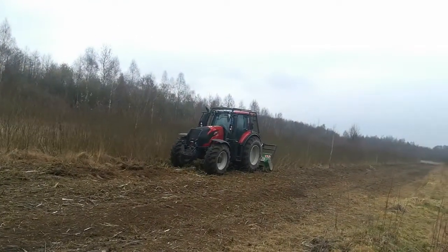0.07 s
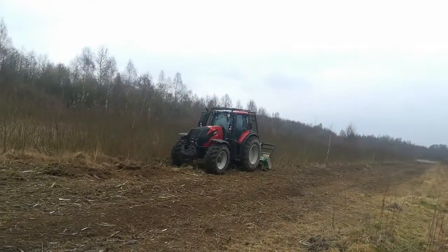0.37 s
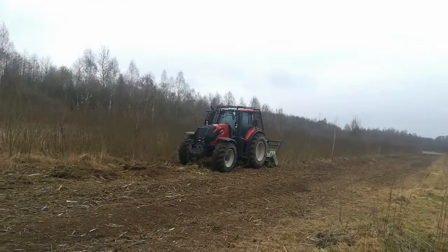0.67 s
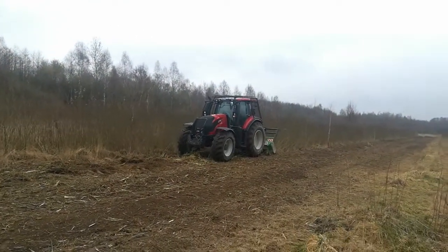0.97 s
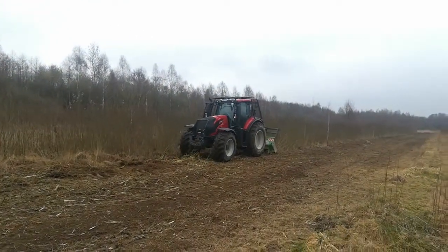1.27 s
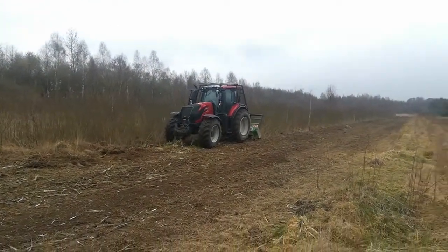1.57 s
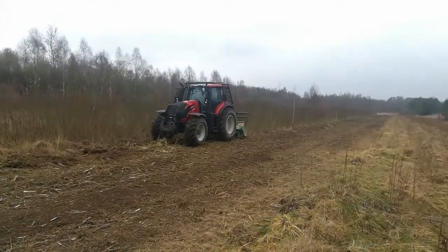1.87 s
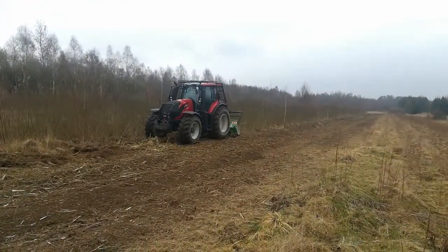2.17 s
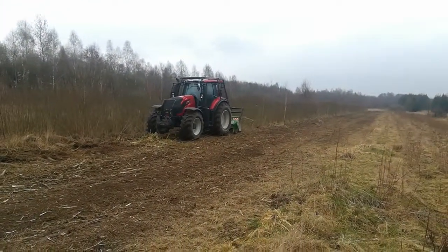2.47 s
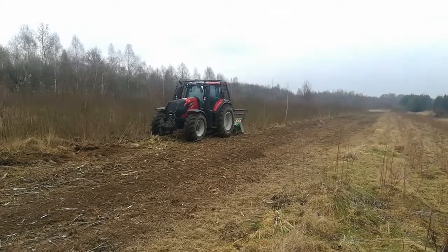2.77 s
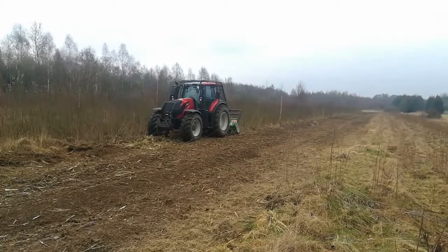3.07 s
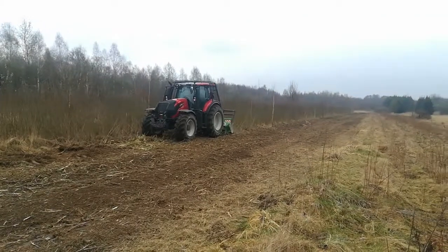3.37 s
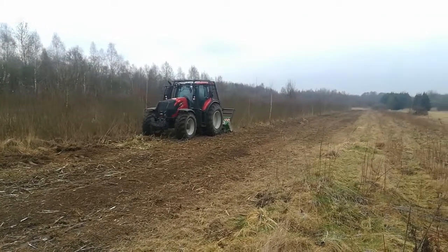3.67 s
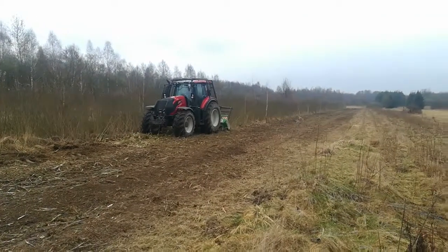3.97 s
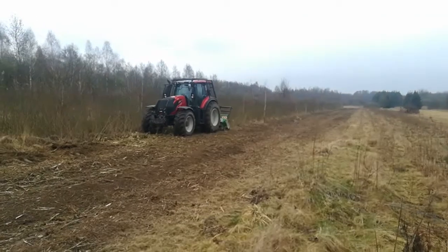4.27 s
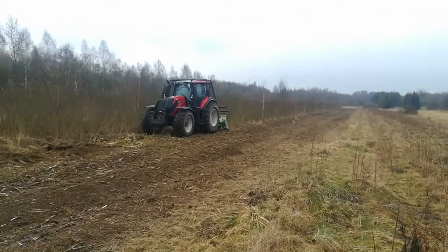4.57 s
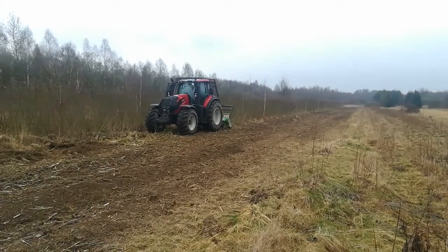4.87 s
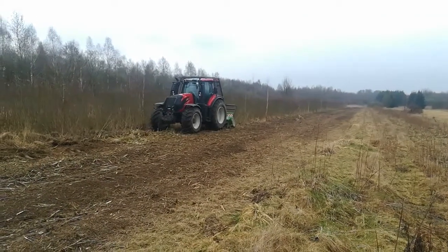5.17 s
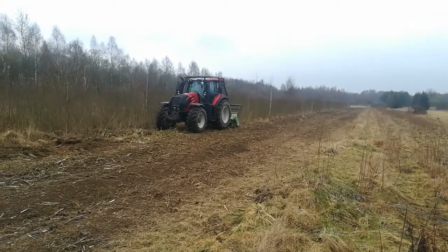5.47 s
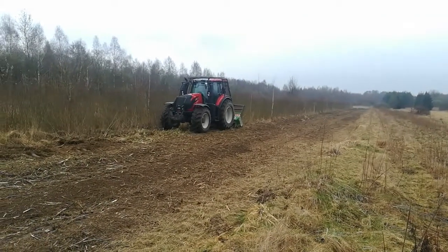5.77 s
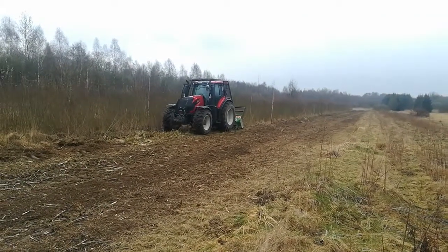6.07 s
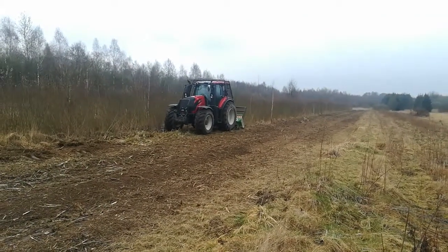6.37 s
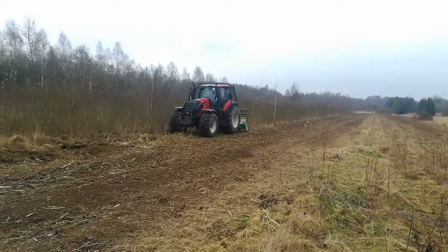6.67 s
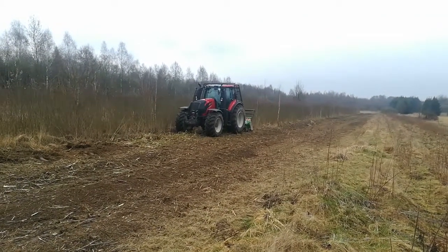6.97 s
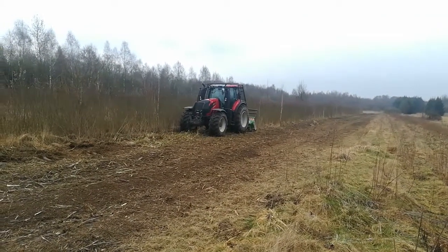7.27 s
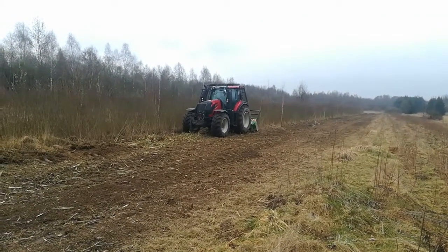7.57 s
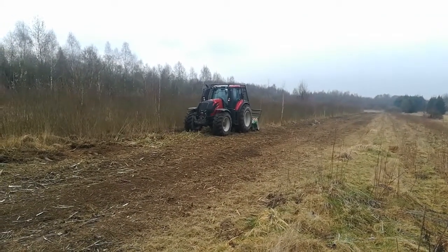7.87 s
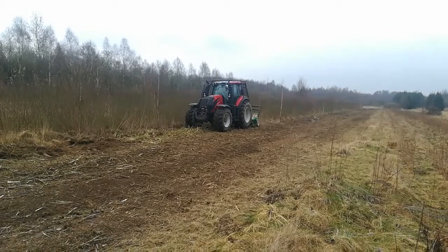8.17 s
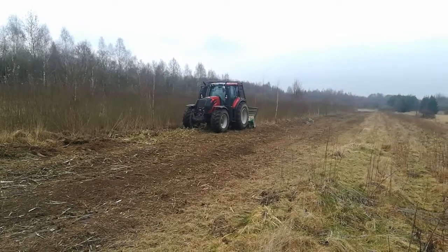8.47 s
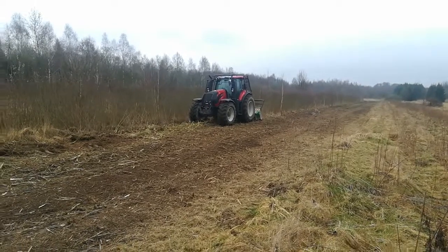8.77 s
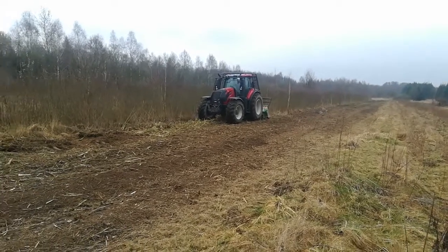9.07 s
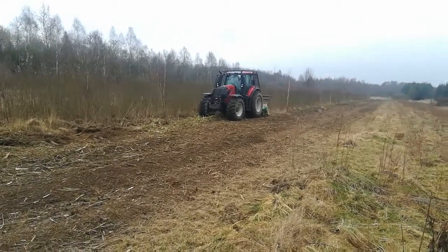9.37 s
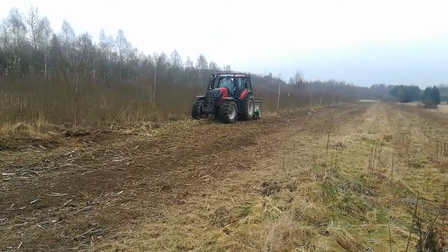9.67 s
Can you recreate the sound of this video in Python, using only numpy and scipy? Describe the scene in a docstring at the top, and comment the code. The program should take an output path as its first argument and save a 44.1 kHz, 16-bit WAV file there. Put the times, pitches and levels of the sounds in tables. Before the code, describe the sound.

A diesel tractor drones throughout, heard from some distance in an open field. Its low exhaust throb blends with engine clatter, the hum of a mulcher rotor and a faint gear whine. Over it runs a constant crackling hiss of twigs and stems being shredded. The first two seconds are the busiest, with surges of crunching, sharp branch snaps and short clangs of wood hitting metal, clustered around 0.3, 0.9, 1.3 and 1.8 seconds. Further snaps come at about 3.2, 3.9, 5.2 and 5.8 to 6.1 seconds, with lighter clangs near 3.2, 5 and 5.7 seconds. A thin whine swells around 2 seconds and again from 4.5 to 6. The engine sags slightly under load and recovers. A few softer snaps fall between 7.4 and 9 seconds, with one last clang, and the machine carries on, slightly quieter, until nearly 10 seconds.

```python
"""Tractor mulching brush.

A six-cylinder diesel creeps away across an open field, driving a flail mulcher at governed speed.
Unequal cylinders make the exhaust throb, firings rattle the block, gears whine and the rotor hums.
The flails shred twigs and stems in a constant crackle; thicker branches snap, and thrown wood
clangs on the steel hood. Heard through two microphone ports."""
import sys
import numpy as np
from scipy import signal
from scipy.fft import rfft, irfft, next_fast_len
from scipy.io import wavfile
from scipy.ndimage import map_coordinates

SR = 44100
rng = np.random.default_rng(int(sys.argv[2]) if len(sys.argv) > 2 else 0)


def dump_mix(stems):
    """Bounce the given channels to the path in sys.argv[1] as a 16-bit WAV at rate SR."""
    frames = np.atleast_2d(stems).T  # one column per channel
    limited = np.clip(frames, -1, 1)  # hard clip at full scale
    pcm = np.round(limited * 32767).astype(np.int16)
    wavfile.write(sys.argv[1], SR, pcm)


N = 428652


def amp(db):
    """Decibels to gain."""
    return 10 ** (np.asarray(db) / 20)


def unit(x):
    """Scale to rms 1."""
    return x / np.sqrt(np.mean(x ** 2) + 1e-20)


def along(points, hz):
    """Interpolate (f/Hz, value) points on a log axis."""
    f, v = np.transpose(points)
    return np.interp(np.log(hz + 1), np.log(f + 1), v)


def curves(rows):
    """One value per sample for each column after t/s."""
    times_s, *columns = np.transpose(rows)
    return [np.interp(np.arange(N) / SR, times_s, column) for column in columns]


def wobble(rate_hz):
    """Smooth random curve with knots at rate_hz."""
    knots = rng.standard_normal(int(N * rate_hz / SR) + 4)
    return map_coordinates(knots, [np.arange(N) * rate_hz / SR])


def filtered(x, response):
    """Apply a complex frequency response."""
    size = next_fast_len(N + SR // 4)
    return irfft(rfft(x, size) * response(np.fft.rfftfreq(size, 1 / SR)), size)[..., :N]


def add(track, start_s, sound):
    """Mix in a short sound."""
    part = track[..., max(round(start_s * SR), 0):][..., :sound.shape[-1]]
    part += sound[..., :part.shape[-1]]


# Likeness of the two ports: f/Hz, coherence
PORT_COHERENCE = [(110, 1), (160, .998), (300, 1), (600, 0.69), (1200, 1), (2000, 0.81), (4000, 0.48),
                  (8000, 0.41), (14000, 0.17)]


def spread(pair, spectrum):
    """Colour two unrelated signals and blend them to stereo at rms 1; the treble is least alike."""
    def response(hz):
        angle = np.arccos(np.clip(along(PORT_COHERENCE, hz), 0, 1)) / 2
        return amp(along(spectrum, hz)) * [np.cos(angle), np.sin(angle)]
    mid, side = filtered(pair, response)
    return unit(np.array([mid + side, mid - side]))


def hum(turns, lines, waver_db, drift_rad, smear=.23):
    """Lines locked to a shaft. Ducts smear each turn's pulse; the air makes level and phase waver."""
    out = np.zeros(N)
    for order, db in lines:
        phase = 2 * np.pi * (order * turns - smear * order ** 2) + drift_rad * wobble(5)
        out += np.sqrt(2) * amp(db + waver_db * wobble(4)) * np.sin(phase)
    return out


# Flail rotor and belt drive lines: shaft order, level/dB
ROTOR_LINES = [(1, -52), (2, -59), (3, -54.5), (4, -49), (5, -57.5), (6, -68)]
BELT_LINES = [(1, -68), (2, -51), (3, -53), (4, -51.5)]


def shaft_hum(cycles):
    """Rotor, belt drive and cooling fan turn at fixed ratios to the engine."""
    rotor = hum(2.864 * cycles, ROTOR_LINES, waver_db=2.5, drift_rad=.16)
    belt = hum(1.704 * cycles, BELT_LINES, waver_db=0, drift_rad=.15)
    fan = hum(10.92 * cycles, [(.99, -42)], waver_db=-.5, drift_rad=.12)
    return rotor + belt + fan


# Gear and block whine, plus a faint steady tone at the hood's ringing pitch, near 1010 Hz:
# engine-cycle order, level/dB
WHINE_LINES = [(31, -66), (34, -63), (36, -55), (38, -61), (43, -54), (47, -54), (49, -53), (51, -53),
               (54.8, -56), (58, -56), (60, -49), (63, -56), (72, -53), (78, -53), (90, -50), (107, -54)]
# One gear mesh singing out under load: t/s, level/dB
MESH_LEVEL = [(0, -67), (2.2, -47), (3.3, -52), (4.2, -56), (4.7, -42), (5.3, -47), (5.9, -45), (6.5, -51),
              (9.72, -50)]


def whine(cycles, path_db):
    """Gear whine and a faint tone at the hood's pitch fade with distance; one mesh swells under load."""
    mesh_db, = curves(MESH_LEVEL)
    mesh = hum(cycles, [(120, 0)], waver_db=1.5, drift_rad=.3)
    tones = hum(cycles, WHINE_LINES, waver_db=2, drift_rad=.25)
    return amp(1.55 * (path_db - path_db.mean())) * tones + amp(mesh_db) * mesh


# Block noise spectrum: f/Hz, relative density/dB
BLOCK_SPECTRUM = [(200, -33), (430, -27), (490, -15), (560, -10.5), (780, -5), (950, -6), (1130, -6.5),
                  (1430, 1.5), (1720, -1.5), (1860, -7.5), (2150, -4), (2550, -15), (3000, -16.5),
                  (9000, -49.5)]
# Bright engine band, sinking in pitch as the tractor draws off: t/s, f/Hz, level/dB
SHEEN_BAND = [(0, 1870, -37.5), (.6, 1807, -34), (1.3, 1655, -44), (2, 1503, -52), (3.5, 1443, -48.5),
              (9.7, 1450, -39)]


def clatter(cycles, path_db, block_db=-30.96, cylinders=6):
    """Every firing rattles the block; each cylinder has its own strength and repeating rattle."""
    firings = cylinders * cycles
    strength = 1 + .07 * np.cos(2 * np.pi * np.floor(firings) / cylinders)
    knock = unit(strength * (1 + .28 * np.exp(-(firings % 1) / .35)))
    one_cycle = rng.standard_normal(round(N / cycles[-1]))
    repeating = map_coordinates(one_cycle, [cycles % 1 * len(one_cycle)], mode="grid-wrap")
    repeating_lows = filtered(repeating, lambda hz: 1 / (1 + (hz / 900) ** 2))
    rattle = rng.standard_normal((2, N)) + np.outer([1, 0], .5 * repeating_lows)
    block = amp(block_db + path_db) * spread(rattle * knock, BLOCK_SPECTRUM)
    sheen_hz, sheen_db = curves(SHEEN_BAND)
    phase = 2 * np.pi * np.cumsum(sheen_hz) / SR
    narrow_noise = sum(wobble(210) * wave(phase) for wave in (np.cos, np.sin))
    return block + amp(sheen_db) * unit(narrow_noise) * knock


# Exhaust lines: engine-cycle order, relative level/dB
EXHAUST_LINES = [(3, -53), (5, -57), (6, -37.5), (7, -47), (9, -49), (10, -39), (11, -42), (12, -39.5),
                 (13, -59), (14, -57), (16, -63), (18, -68), (20, -67), (21, -71)]
# Gas flow spectrum: f/Hz, relative density/dB
ROAR_SPECTRUM = [(15, -30), (28, -3), (45, -13.5), (90, 4), (130, 1.5), (185, -1), (225, -4), (280, -12.5),
                 (420, -18.5), (700, -50), (2000, -90)]


def exhaust(cycles, gain_db, throb_db=-32, roar_db=-38.9):
    """Unequal cylinders put strong lines between the firing orders; the gas flow roars beneath."""
    throb = unit(hum(cycles, EXHAUST_LINES, waver_db=1, drift_rad=.056))
    roar = spread(rng.standard_normal((2, N)), ROAR_SPECTRUM)
    return amp(gain_db) * (amp(throb_db) * throb + amp(roar_db) * roar)


def splinters(count=16000):
    """Dense tiny ticks in clumps, each with its own pitch, decay, size and side."""
    start, pitch, life, phase, size, side = rng.random((6, count, 1))
    t = np.arange(SR // 400) / SR
    hz = 2000 * 7 ** pitch
    t60_s = .001 + .002 * life
    ticks = amp(12 * size ** 3) * np.sin(2 * np.pi * (hz * t + phase)) * amp(-60 * t / t60_s)
    samples = ((start * N).astype(int) + np.arange(len(t))).ravel()
    pans = np.cos(2 * np.pi * side), np.sin(2 * np.pi * side)
    pair = [np.bincount(samples, (ticks * pan).ravel(), N)[:N] for pan in pans]
    return unit(np.array(pair) * amp(1.5 * wobble(30)))


# Whole bushes dragged into the rotor: t/s, decay/s, extra hiss/dB, extra crunch/dB
BUSH_BITES = [(.19, .2, 4.5, 5), (.27, 0.1, 0.5, 2), (.89, 0.11, 6.5, 8), (1.06, 0.044, 3, 4),
              (1.55, .06, 4, 0), (1.79, .1, 4.5, 3), (1.905, 0.041, 8.5, -2), (3.19, .09, 4, 0),
              (4.19, 0.11, 3, 2), (5.18, .06, 1, 3), (5.775, .05, 3, 4), (5.86, .07, 3, -4),
              (6.125, .07, 1.5, 5), (6.73, 0.083, 1, 7.5), (7.4, .06, 2.5, 3), (7.69, .08, 4.5, 0),
              (8.29, 0.078, 4, 3), (8.41, .07, 2.5, 8), (8.94, .06, 0, 8)]


def bites_db(attack_s=.012):
    """Extra hiss and crunch: each bush loads the flails quickly, then is used up steadily."""
    t = np.arange(N) / SR
    extra_db = np.zeros((2, N))
    for start_s, decay_s, twigs_db, stems_db in BUSH_BITES:
        load = np.interp(t - start_s, [0, attack_s, attack_s + decay_s], [0, 1, 0])
        extra_db += np.outer([twigs_db, stems_db], load)
    return extra_db


# Intake of twigs and of thick stems between bushes: t/s, relative level/dB
TWIG_FEED = [(0, -40.5), (.12, -45), (.5, -40), (.7, -42.5), (1.1, -41), (1.6, -46), (1.85, -43.5),
             (2.2, -45.5), (2.5, -43.5), (3.1, -44.5), (4.1, -47.5), (4.7, -47.5), (5.1, -44.5),
             (5.6, -47.5), (6.7, -47.5), (7.25, -45.5), (8.05, -49.5), (8.5, -47), (9.72, -47.5)]
STEM_FEED = [(0, -40.5), (.55, -39.5), (.75, -43.5), (2, -43), (5.7, -42.5), (6.4, -44.5), (8.1, -48),
             (8.4, -46.5), (9.72, -48)]
# Spectra of shredded twigs and splitting stems: f/Hz, relative density/dB
TWIG_SPECTRUM = [(600, -38), (1800, -11), (2900, -3.5), (3600, -6), (4050, -2), (4400, -1), (4900, 1.5),
                 (5500, -1), (6400, -6.5), (8000, -6.5), (9600, -6.5), (11000, -14.5), (13500, -19.5),
                 (16000, -24)]
STEM_SPECTRUM = [(800, -36), (2000, -6), (2550, -0.5), (2950, 1.5), (3350, -3.5), (3750, -2), (4050, -23),
                 (4700, -13), (7000, -21), (16000, -35)]


def shredding():
    """Stems crunch and twigs hiss under the flails; the more goes in, the brighter the hiss."""
    twigs_db, stems_db = np.array(curves(TWIG_FEED) + curves(STEM_FEED)) + bites_db()
    clumps = wobble(22)
    crunch = spread(rng.standard_normal((2, N)) + .5 * splinters(), STEM_SPECTRUM)
    hiss = spread(rng.standard_normal((2, N)) + .49 * splinters(), TWIG_SPECTRUM)
    treble = filtered(hiss, lambda hz: 1 / (1 + (7000 / (hz + 1)) ** 6))
    treble_gain = amp(.11 * (twigs_db - twigs_db.mean()))
    hiss += (treble_gain - 1) * treble
    return amp(stems_db + .49 * clumps) * crunch + amp(twigs_db + 3 + .52 * clumps) * hiss


# Breaking branches: t/s, relative level/dB, f/Hz
BRANCH_SNAPS = [(.175, -24.5, 4700), (0.283, -24, 5500), (.710, -27, 4600), (.839, -24, 3200),
                (.890, -24, 7000), (.899, -24, 6500), (0.906, -21, 5000), (1.829, -24, 3000),
                (1.871, -23, 2600), (2.005, -28, 3500), (2.038, -24, 2000), (3.214, -23, 2100),
                (3.912, -23, 2200), (5.196, -23.5, 3300), (5.787, -29, 3500), (5.880, -25.5, 2400),
                (6.117, -25, 2500), (6.135, -31, 3000), (7.422, -33, 2620), (8.296, -29, 2580),
                (8.612, -26.5, 4190), (8.793, -29, 2800), (8.955, -28, 3800)]


def snaps(t60_s=.059, trim_db=-7.5):
    """Each branch breaks with a short noise burst around its own pitch."""
    out, t = np.zeros((2, N)), np.arange(SR // 10) / SR
    hz = np.fft.rfftfreq(len(t), 1 / SR)
    for start_s, db, pitch_hz in BRANCH_SNAPS:
        peak = 1 / (1 + (np.log((hz + 1) / pitch_hz) / .6) ** 2)
        colour = peak / (1 + (hz / 10000) ** 4)
        noise = unit(irfft(rfft(rng.standard_normal((3, len(t)))) * colour, len(t)))
        burst = noise[0] + .83 * noise[1:]  # common part plus one per side
        add(out, start_s, amp(db + trim_db) * amp(-60 * t / t60_s) * burst)
    return out


# Steel hood modes: f/Hz, relative level/dB, t60/s
HOOD_MODES = [(776, -0.5, 0.17), (1006.4, -4, 0.19), (1360, -3, 0.035), (1420, -2, .025), (1704, 3, 0.071),
              (1850, 0, .035), (2440, -4.5, 0.06), (3260, -2.5, 0.039), (4090, -0.5, 0.059),
              (4940, -3, 0.032)]
# Wood thrown against the hood: t/s, relative level/dB, centre f/Hz
HOOD_HITS = [(.177, -14, 2830), (.185, -28, 1010), (0.213, -18.5, 3300), (.237, -24, 3300),
             (.297, -12.5, 1600), (.300, -21, 780), (.318, -22, 780), (.330, -25, 1010),
             (.342, -10.5, 3630), (.344, -13.5, 1580), (.547, -18, 1800), (.914, -20.5, 1010),
             (.936, -24, 1010), (.962, -29, 1010), (1.276, -16.5, 2000), (1.280, -13, 1440),
             (1.829, -21, 2300), (1.837, -16.5, 1400), (3.204, -17, 1500), (5.007, -22, 1700),
             (5.740, -23, 3250), (8.955, -21, 2180)]


def clangs(attack_s=.00025, crack_t60_s=.02, trim_db=-3):
    """Chunks crack against the hood; where they land picks the modes, and clinging soil roughens them."""
    out, t = np.zeros((2, N)), np.arange(SR // 4) / SR
    mode_hz, mode_db, t60_s = np.transpose(HOOD_MODES)[..., None]
    for start_s, db, centre_hz in HOOD_HITS:
        octaves_off = np.abs(np.log2(mode_hz / centre_hz))
        strength = amp(mode_db + rng.normal(0, 1, mode_hz.shape) - 22 * octaves_off ** .6)
        wander_rad = mode_hz / 70000 * np.cumsum(rng.standard_normal((len(mode_hz), len(t))), axis=1)
        phase = 2 * np.pi * (mode_hz * t + rng.random(mode_hz.shape)) + wander_rad
        modes = strength * amp(-60 * t / t60_s) * np.sin(phase)
        ring = modes.sum(axis=0) / np.linalg.norm(strength)
        band = signal.butter(1, [centre_hz / 2, centre_hz * 1.5], "bandpass", fs=SR, output="sos")
        noise = signal.sosfilt(np.tile(band, (2, 1)), rng.standard_normal((2, len(t))))
        crack = unit(noise) * amp(-60 * t / crack_t60_s)
        onset = 1 - np.exp(-t / attack_s)
        add(out, start_s, amp(db + trim_db) * (ring + .33 * crack) * onset)
    return out


# Engine speed, sagging under load and recovering: t/s, four-stroke cycle rate/Hz
ENGINE_SPEED = [(0, 16.09), (.8, 16.055), (1.8, 16.085), (2.5, 16.035), (2.95, 15.9), (4, 15.865),
                (4.75, 16.12), (5.5, 16.07), (6.12, 16.08), (6.55, 15.94), (7.56, 15.88), (7.92, 15.96),
                (8.28, 16.135), (8.64, 16.115), (9.05, 15.865), (9.72, 15.77)]
START_M, CREEP_M_PER_S = 14.3, .67
EXHAUST_DB_PER_HZ, AIR_SWELL_DB = 3, .5


def scene():
    """All shafts follow the engine, which fades with distance and throbs less when dragged down."""
    cycle_hz, = curves(ENGINE_SPEED)
    cycles = np.cumsum(cycle_hz) / SR
    distance_m = START_M + CREEP_M_PER_S * np.arange(N) / SR
    spreading_db = 20 * np.log10(START_M / distance_m)
    exhaust_gain_db = spreading_db + EXHAUST_DB_PER_HZ * (cycle_hz - cycle_hz.mean())
    path_db = spreading_db + AIR_SWELL_DB * wobble(7)
    tractor = exhaust(cycles, exhaust_gain_db) + clatter(cycles, path_db) + whine(cycles, path_db)
    return tractor + shaft_hum(cycles) + shredding() + snaps() + clangs()


# Port balance: f/Hz, left minus right/dB
PORT_BALANCE = [(200, -0.5), (380, 0.5), (550, 9), (900, 9), (1400, 3.5), (2100, 8.5), (3100, 0),
                (4100, -1), (5900, 2), (6900, -11.5), (8000, -8.5), (9500, 0), (12000, -1.5), (13700, -4)]
# Port phase: f/Hz, left lead/rad
PORT_PHASE = [(40, .02), (170, .1), (300, .6), (520, .7), (1120, -.1), (1980, .2), (2760, -1), (3790, -1.1),
              (4500, -6.2), (6200, -8.6), (8100, -7.6), (15000, -9.5)]
# Microphone swinging off the tractor and back: t/s, left lead/ms
MIC_SWING = [(0, -.03), (.7, -.04), (1.8, 0), (2.6, .02), (4.5, .045), (6, .02), (7.5, -.005), (9.72, -.03)]
BAND_LIMIT_HZ = 15850


def record(dry):
    """Two band-limited ports face different ways and colour the sound; their swing shifts the delay."""
    def ports(hz):
        gain = amp(np.outer([.5, -.5], along(PORT_BALANCE, hz)))
        lead = np.exp(1j * np.outer([.5, -.5], along(PORT_PHASE, hz)))
        return gain / gain.mean(axis=0) * lead * (hz < BAND_LIMIT_HZ)
    lead_ms, = curves(MIC_SWING)
    shift_samples = lead_ms * SR / 1000 / 2
    swung = [map_coordinates(port, [np.arange(N) + sign * shift_samples], order=5, mode="nearest")
             for port, sign in zip(dry, (1, -1))]
    return filtered(np.array(swung), ports)


dry = scene()
out = record(dry)
dump_mix(out)
```